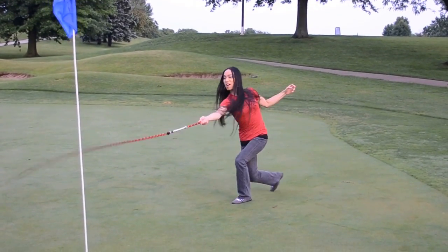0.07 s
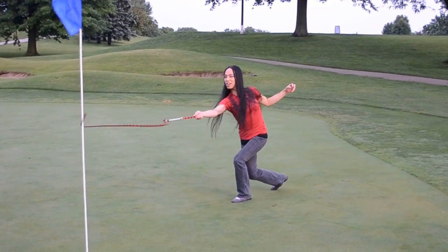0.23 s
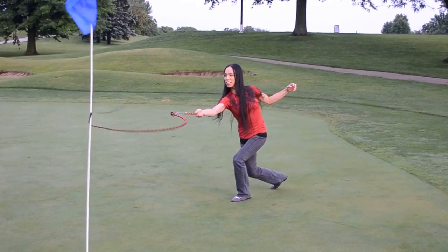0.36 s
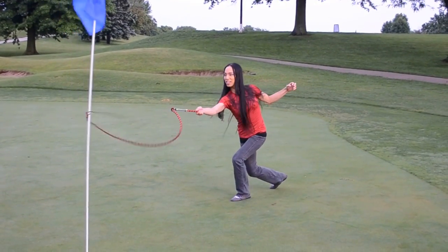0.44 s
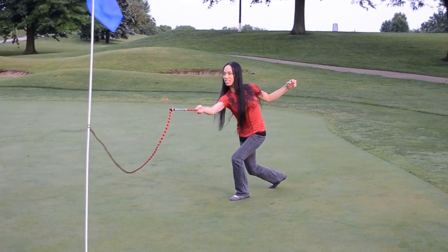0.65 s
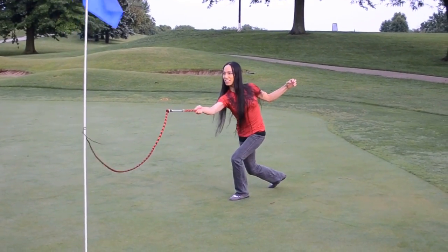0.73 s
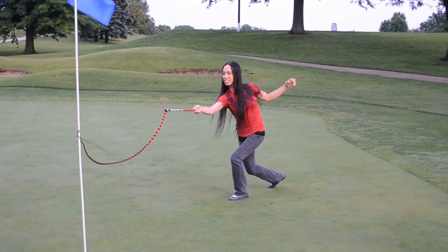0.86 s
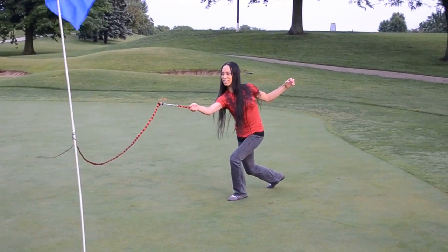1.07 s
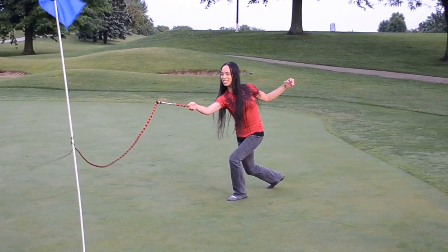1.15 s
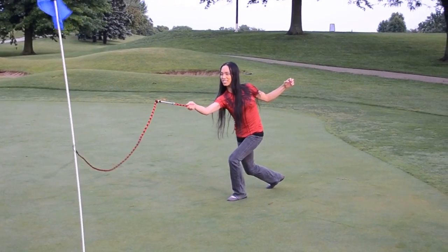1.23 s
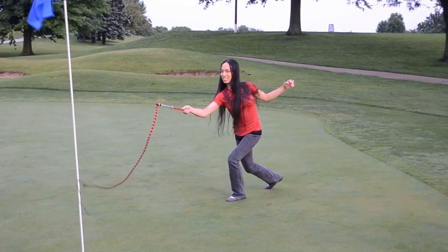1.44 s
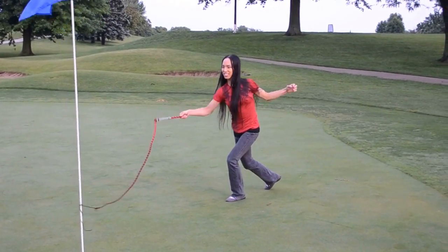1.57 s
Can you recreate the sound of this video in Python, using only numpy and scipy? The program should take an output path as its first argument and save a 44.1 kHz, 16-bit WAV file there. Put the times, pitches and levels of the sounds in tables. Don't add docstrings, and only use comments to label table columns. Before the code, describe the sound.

A whip swishes up and cracks once, extremely loud and slightly overloaded on a small camera microphone, followed by short crackling echoes from trees; faint traffic rumble continues, then tiny ticks and a bird whistle.

```python
import sys
import numpy as np
from scipy import signal
from scipy.fft import rfft, irfft, next_fast_len
from scipy.io import wavfile
from scipy.ndimage import uniform_filter1d, map_coordinates

SR = 44100
rng = np.random.default_rng(int(sys.argv[2]) if len(sys.argv) > 2 else 0)


def to_wav(sig):
    pcm = np.clip(np.atleast_2d(sig), -1, 1) * 32767
    pcm = np.round(pcm).astype(np.int16)
    wavfile.write(sys.argv[1], SR, pcm.T)


def ratio(d):
    e = np.asarray(d, float) / 20
    return 10 ** e


N = 70560
T = np.arange(N) / SR


def unit(x):
    return x / np.sqrt(np.mean(x ** 2) + 1e-20)


def coloured(x, points):
    size = next_fast_len(N + 8192)
    hz, db = np.transpose(points)
    bins = np.log(np.fft.rfftfreq(size, 1 / SR) + 1)
    gain = ratio(np.interp(bins, np.log(hz + 1), db, -120, -120))
    return unit(irfft(rfft(x, size) * gain, size)[:N])


def noise(points):
    return coloured(rng.standard_normal(N), points)


def wobble(rate):
    knots = rng.standard_normal(int(N * rate / SR) + 4)
    return map_coordinates(knots, [T * rate])


def sine(hz, phase=0):
    return np.sin(2 * np.pi * hz * T + phase)


def ring(start, db, hz, t60, rise=.00003):
    t = np.clip(T - start, 0, None)
    return ratio(db - 60 * t / t60) * (1 - np.exp(-t / rise)) * np.sin(2 * np.pi * hz * t)


def shape(start, rise, hold, t60):
    attack = np.clip((T - start) / rise, 0, 1)
    return attack * ratio(-60 * np.clip(T - start - rise - hold, 0, None) / t60)


def passed(x, order, hz, kind):
    return signal.sosfilt(signal.butter(order, hz, kind, fs=SR, output="sos"), x)


def soft_limit(x, ceiling):
    knee = 6
    return x / (1 + np.abs(x / ceiling) ** knee) ** (1 / knee)


# pitch_hz, level_db
ROAD_COLOUR = [(28, -32), (65, -5), (150, -1), (280, -3.5), (420, -8.5), (1100, -2), (1750, -4.5),
               (2100, -10), (4000, -20.5), (5000, -48.5)]


def traffic():
    grid = signal.stft(rng.standard_normal(N + 512), nperseg=512)[2]
    patches = uniform_filter1d(rng.standard_normal(grid.shape), 5, 0)
    patches = uniform_filter1d(patches, 8, 1)
    road = signal.istft(grid * ratio(1.77 * unit(patches)), nperseg=512)[1][:N]
    return ratio(-39.5 + 0.41 * wobble(3)) * coloured(road, ROAD_COLOUR)


# pitch_hz, level_db
AIR_COLOUR = [(2000, -19.5), (3000, -0.5), (4000, -9), (6100, -21.5), (8000, -32.5), (10700, -32.5),
              (11300, -58)]


def air():
    return ratio(-56.5) * noise(AIR_COLOUR)


# start_s, level_db, length_s, pitch_hz
TRAFFIC_SWELLS = [
    (.43, -45, .025, 620),
    (.455, -42, .04, 900),
    (.545, -45, .02, 850),
    (.16, -44, .03, 900),
    (1.37, -42, .03, 950),
]


def swells():
    out = np.zeros(N)
    for start, db, length, hz in TRAFFIC_SWELLS:
        band = noise([(hz / 2.7, -20), (hz, 0), (hz * 1.3, -20)])
        out = out + ratio(db) * shape(start, length / 2, length / 4, length) * band
    return out


# pitch_hz, level_db
MOWER_TONES = [
    (77, -57),
    (150, -57.5),
    (228, -56.5),
    (258, -59.5),
]


def mower():
    out = np.zeros(N)
    for hz, db in MOWER_TONES:
        out = out + ratio(db + 2.5 + 2.1 * wobble(8.8)) * sine(hz, 1.47 * wobble(7.34))
    return out


def cricket():
    pitch_hz, strokes_per_s, start_s = 10550, 56.1, .0133
    strokes = np.sin(2 * np.pi * strokes_per_s * (T - start_s))
    gate = np.clip(1.6 * strokes + 0.54, 0, 1)
    return ratio(-81 + 1.3 * wobble(20)) * gate * sine(pitch_hz, 0.87 * wobble(160.7))


# time_s, pitch_hz, level_db
BIRD_NOTES = [
    [(1.385, 2960, -56), (1.414, 2930, -52), (1.427, 2420, -52), (1.441, 2350, -44), (1.45, 2350, -52)],
    [(1.483, 2750, -56), (1.495, 2900, -53), (1.505, 3060, -51), (1.521, 2960, -53), (1.532, 2700, -58)],
]


def bird():
    out = np.zeros(N)
    for note in BIRD_NOTES:
        s, hz, db = np.transpose(note)
        edge = np.clip(np.minimum(T - s[0], s[-1] - T) / .005 + 1, 0, 1)
        phase = 2 * np.pi * np.cumsum(np.interp(T, s, hz)) / SR
        out = out + edge * ratio(np.interp(T, s, db) + 4.3) * np.sin(phase)
    return out


# start_s, level_db, hold_s, t60_s, tilt_db_per_octave (small leaves bright)
LEAF_GROUPS = [
    (0.2513, -37.5, 0.0077, 0.027, -0.5),
    (.274, -51.5, 0.0074, .03, 7),
    (.285, -27.5, 0.018, .13, 0.5),
    (0.315, -29.5, 0.02, 0.1, -4.5),
    (0.354, -35.5, 0.022, 0.053, -1),
    (0.372, -39, 0.013, 0.044, -2),
    (0.391, -43, 0.018, 0.55, -1.5),
    (0.536, -51, 0.14, 1.2, -5),
]
# pitch_hz, level_db
ECHO_COLOUR = [(500, -35), (900, -10), (1500, -4.5), (3000, 1.5), (6000, -6), (9300, -16), (11200, -29.5),
               (11700, -51.5)]


def leaf_echoes():
    grains_per_s, grain_spread_db, diffuse = 7000, 3, 1.1
    hits = (rng.random(N) < grains_per_s / SR) * rng.choice([-1, 1], N)
    grains = hits * ratio(grain_spread_db * rng.exponential(size=N).clip(0, 2.5))
    source = unit(grains) + diffuse * rng.standard_normal(N)
    source = source * ratio(1.6 * wobble(149.2))
    out = np.zeros(N)
    for start, db, hold, t60, tilt in LEAF_GROUPS:
        colour = [(f, level + tilt * np.log2(f / 3000)) for f, level in ECHO_COLOUR]
        rise = min(.35 * hold, .008)
        out = out + ratio(db) * shape(start, rise, hold, t60) * coloured(source, colour)
    return out


# start_s, level_db, pitch_hz
TRUNK_ECHOES = [(.252, -30, 4500), (.291, -22, 3500), (.297, -22, 3800), (.3003, -16, 3200),
                (.3038, -20, 3300), (.3125, -20, 2600), (.319, -19, 2800), (.3241, -14, 2200),
                (.3249, -19, 1500), (.331, -22, 2400), (.3372, -22, 1600), (.357, -23, 2600),
                (.3763, -17, 3300), (.3878, -25, 2500), (.598, -30, 1800)]


def trunk_echoes():
    out = np.zeros(N)
    for start, db, hz in TRUNK_ECHOES:
        out = out + ring(start, db, hz, 8 / hz) - ring(start, db - 5, 1.9 * hz, 8 / hz)
    return out


# start_s, level_db, length_s, pitch_hz
POLE_TICKS = [(.9105, -57, .003, 4800), (.9145, -58, .003, 4800), (.9368, -50, .003, 3000),
              (.9368, -54, .003, 6300), (.9368, -62, .003, 8500), (.941, -58, .003, 6500),
              (.9445, -55, .003, 4000), (.969, -59, .003, 5100), (.9848, -58, .003, 6500),
              (.9848, -65, .003, 8800), (1.066, -71, .003, 9000), (1.12, -62, .006, 7000),
              (1.121, -65, .007, 9000), (1.131, -70, .005, 9000), (1.187, -70, .003, 8500),
              (1.208, -68, .003, 9200), (1.263, -68, .012, 8500), (1.2775, -57, .006, 6000),
              (1.2775, -62, .006, 8200), (1.287, -62, .008, 8300), (1.286, -61, .004, 5800),
              (1.295, -68, .005, 9000)]


def ticks():
    out = np.zeros(N)
    for start, db, length, hz in POLE_TICKS:
        hiss = noise([(hz / 2, -20), (hz / 1.3, -4), (hz, 0), (hz * 1.15, -5), (hz * 1.35, -24)])
        level = ratio(db - 1.5 + 3 * wobble(300))
        out = out + level * shape(start, .001, length / 2, 2 * length) * hiss
    return out


# time_s, level_db
LASH_SPEEDUP = [
    (0, -72),
    (.15, -68),
    (.19, -58),
    (.208, -46),
    (.2125, -39),
    (.216, -29),
    (.2205, -26),
]
# pitch_hz, level_db
LASH_COLOUR = [(300, -48.5), (1000, -9), (2500, 2), (4000, -6), (10000, -11.5), (11400, -22), (11800, -60)]
# start_s, level_db, pitch_hz
LOOP_FLICKS = [
    (.168, -29, 947),
    (.174, -33.5, 945),
    (.209, -25, 806),
]


def lash():
    s, db = np.transpose(LASH_SPEEDUP)
    out = ratio(np.interp(T, s, db, -120, -120)) * noise(LASH_COLOUR)
    for start, level, hz in LOOP_FLICKS:
        out = out + ring(start, level, hz, .025, .001)
    return out


# start_s, level_db
SHOCK_ARRIVALS = [
    (.2205, 5.5),
    (.222, -21),
]
# pitch_hz, level_db, t60_s
HOUSING_TONES = [
    (860, -1.3, .0066),
    (1310, -13.5, .0114),
    (1700, 9.7, .0056),
    (2060, -1.4, .0056),
    (2870, 9.5, .0038),
    (3960, 2.7, .0039),
    (4840, -9.5, .0044),
    (5220, -6, .0038),
    (7030, -25, .01),
]
# pitch_hz, level_db
FIZZ_COLOUR = [(5000, -18), (9000, 1), (14000, -14.5), (16300, -10.5), (16700, -56)]


def crack():
    start = SHOCK_ARRIVALS[0][0]
    body = ring(start, -5, 270, .0114)
    for arrival, db in SHOCK_ARRIVALS:
        for hz, level, t60 in HOUSING_TONES:
            body = body - ring(arrival, db + level, hz, t60)
    burst = ratio(-24) * shape(start, .001, .001, .025)
    near_turf = ratio(-41) * shape(start, .0018, .0078, .084)
    spray = (burst + near_turf) * noise(LASH_COLOUR)
    overloaded = soft_limit(body + spray, .6)
    fizz = ratio(-27) * shape(start - .009, .009, .003, .026) ** 2 * noise(FIZZ_COLOUR)
    capsule = ring(.22135, 19.5, 12110, .00069, .00028)
    return passed(overloaded + fizz + capsule, order=2, hz=90, kind="high")


def scene():
    background = traffic() + air() + swells() + mower() + cricket() + bird()
    far = background + leaf_echoes() + trunk_echoes() + ticks() + lash()
    return (crack() + passed(far, order=16, hz=11600, kind="low"))[None]


def roll_off(x):
    return signal.sosfilt(signal.butter(12, 16690, fs=SR, output="sos"), x)


def record(dry):
    held = soft_limit(dry, .93)
    mix = passed(held, order=8, hz=15800, kind="low")
    return roll_off(mix)


dry = scene()
out = record(dry)
to_wav(out)
```